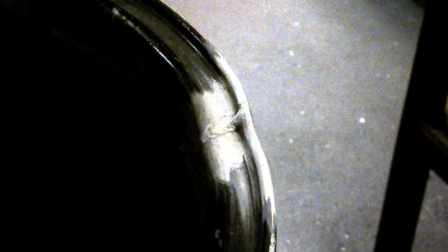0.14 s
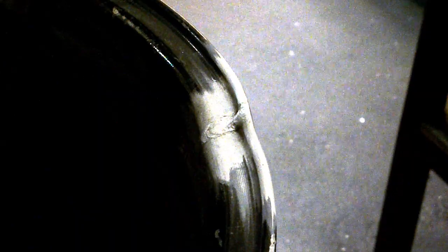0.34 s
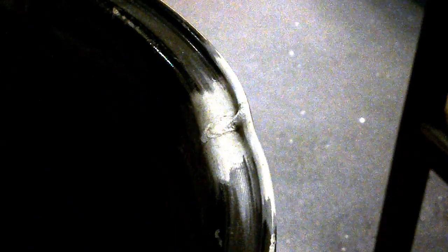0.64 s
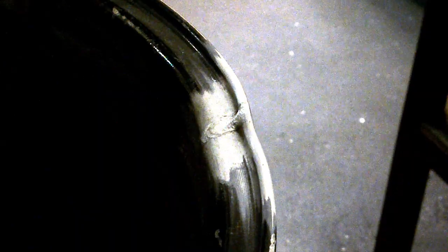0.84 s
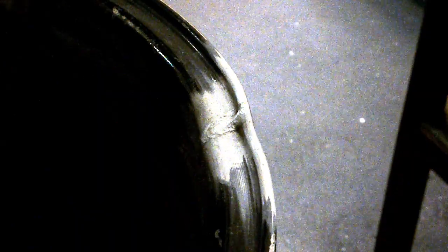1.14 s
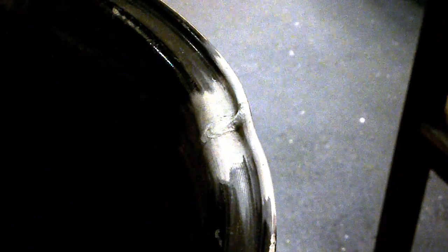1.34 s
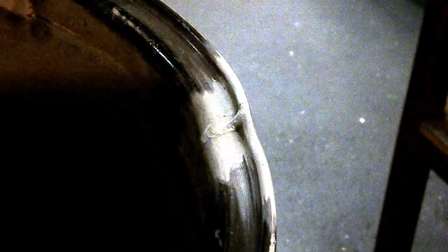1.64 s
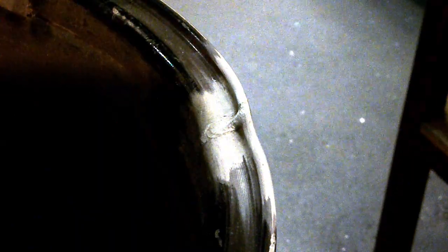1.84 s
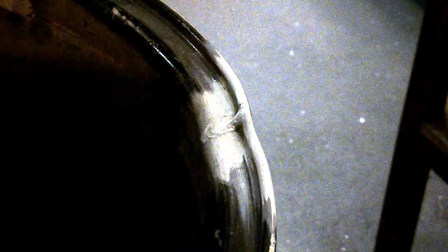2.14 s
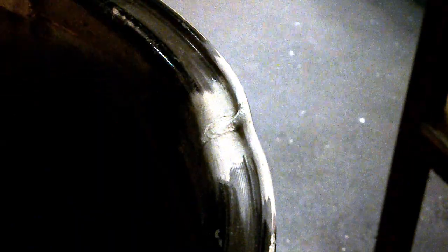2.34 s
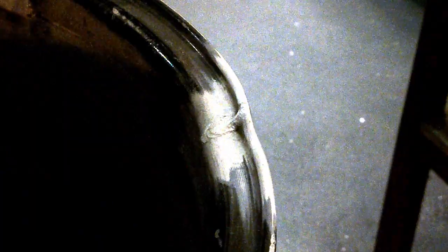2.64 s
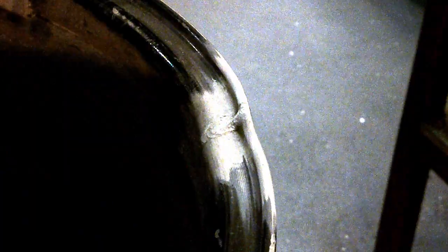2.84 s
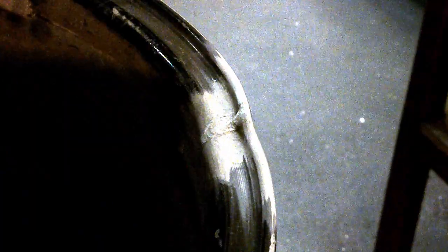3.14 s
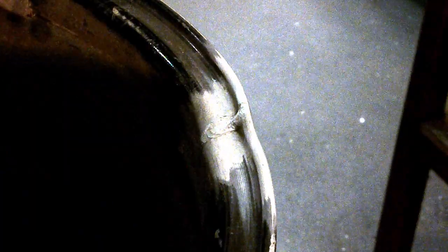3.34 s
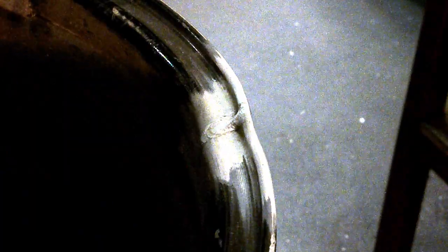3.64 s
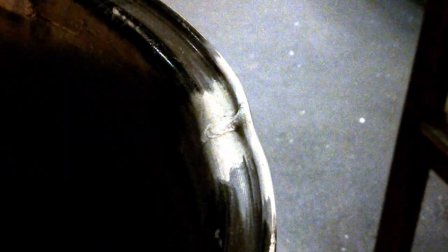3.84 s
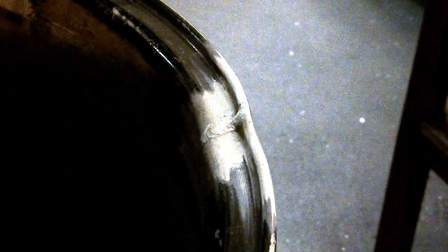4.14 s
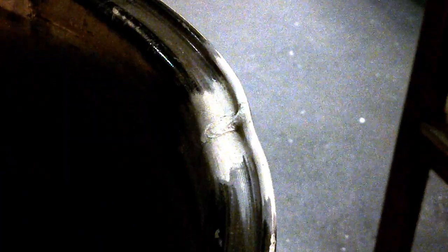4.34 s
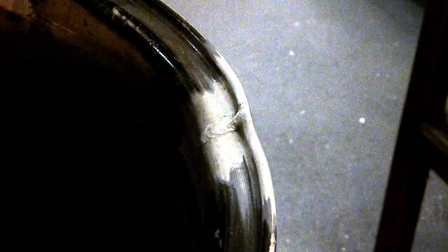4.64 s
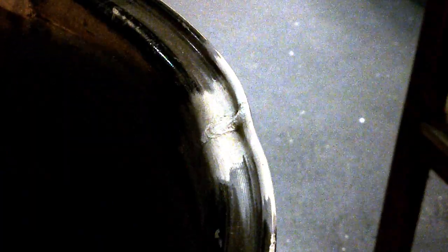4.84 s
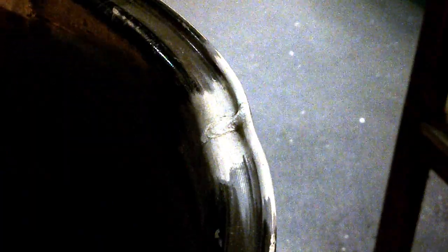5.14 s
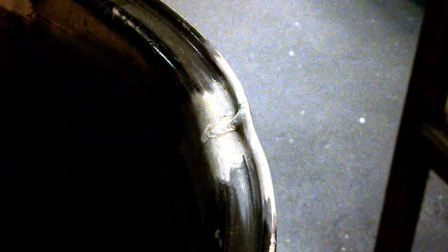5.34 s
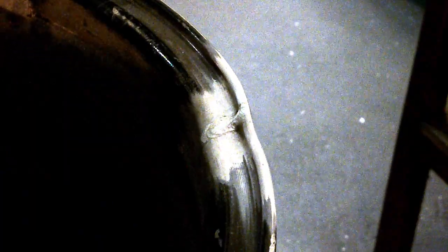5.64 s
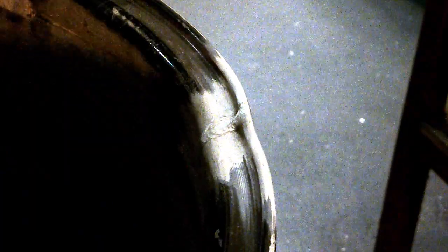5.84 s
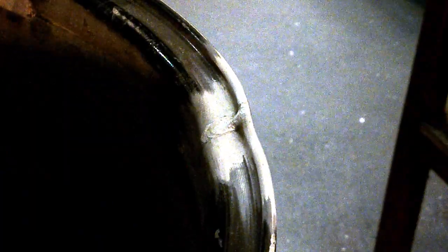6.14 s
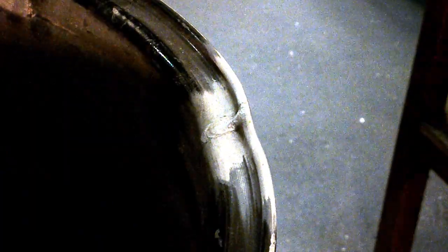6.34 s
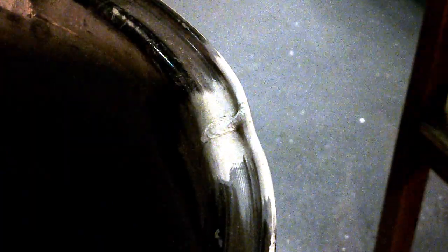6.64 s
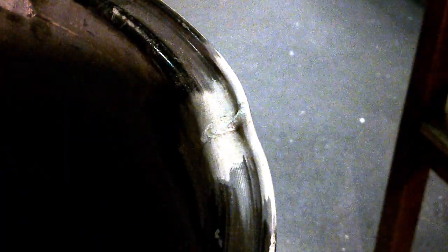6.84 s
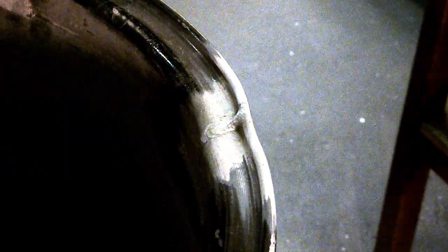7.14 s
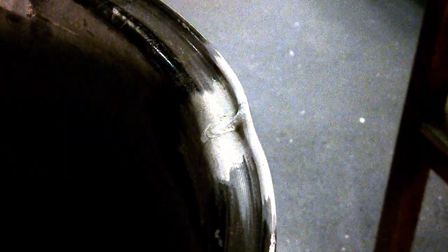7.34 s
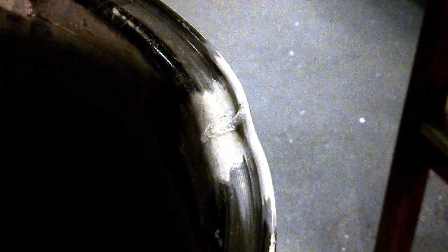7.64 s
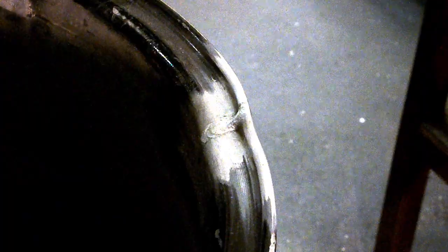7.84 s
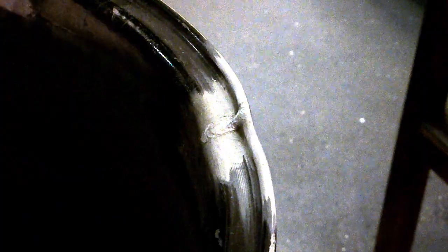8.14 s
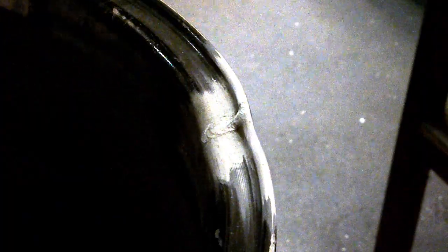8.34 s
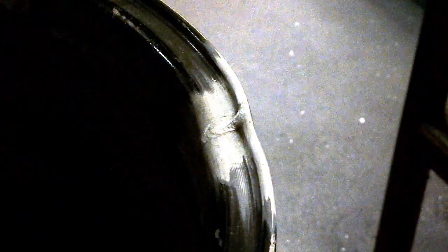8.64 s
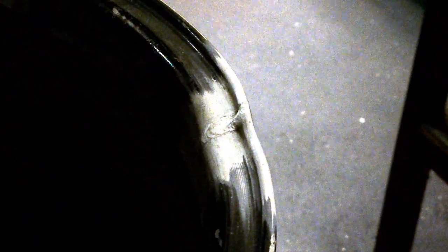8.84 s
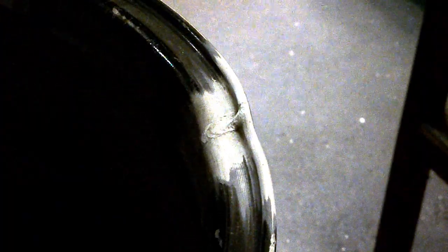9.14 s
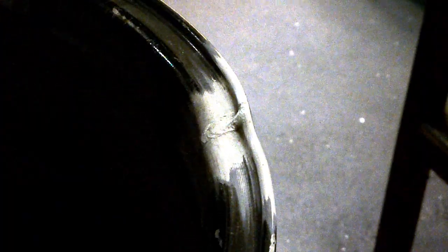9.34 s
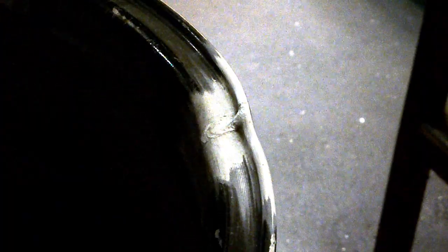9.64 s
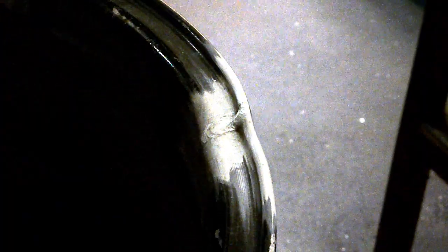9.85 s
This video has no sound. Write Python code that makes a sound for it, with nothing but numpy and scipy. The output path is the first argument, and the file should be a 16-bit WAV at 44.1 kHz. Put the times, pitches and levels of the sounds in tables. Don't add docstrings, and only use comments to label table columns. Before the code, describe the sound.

A torch ignites with a hard pop after two fluttering spits, roars softly with buzzing fuel hiss, then builds stepwise into a fierce bright jet.

```python
import sys
import numpy as np
from scipy import signal
from scipy.fft import rfft, irfft, next_fast_len
from scipy.io import wavfile
from scipy.ndimage import uniform_filter1d

SR = 44100
rng = np.random.default_rng(int(sys.argv[2]) if len(sys.argv) > 2 else 0)


def gain_from_db(level_db):
    decades = np.asarray(level_db, float) / 20
    return 10 ** decades


def to_wav(s):
    ch = np.atleast_2d(s).T
    pcm = np.round(np.clip(ch, -1, 1) * 32767)
    wavfile.write(sys.argv[1], SR, pcm.astype(np.int16))


N = 440118
TIME = np.arange(N) / SR
PADDED = next_fast_len(N, True)


def shape(x, tone):
    hz, db = np.transpose(tone)
    f = np.maximum(np.fft.rfftfreq(PADDED, 1 / SR), 1)
    gain = gain_from_db(np.interp(np.log(f), np.log(hz), db, left=-90, right=-90))
    return irfft(rfft(x, PADDED) * gain, PADDED)[:N]


def level(x, lo_hz, hi_hz):
    band = slice(int(lo_hz * PADDED / SR), int(hi_hz * PADDED / SR))
    power = np.abs(rfft(x, PADDED)[band]) ** 2
    return x * np.sqrt(N * PADDED / (2 * power.sum()))


def bumps(x, modes):
    f = np.fft.rfftfreq(4096, 1 / SR)
    db = sum(d / (1 + (2 * (f - hz) / width) ** 2) for hz, width, d in modes)
    cepstrum = irfft(np.log(gain_from_db(db)))
    cepstrum[1:2048] *= 2
    cepstrum[2049:] = 0
    response = irfft(np.exp(rfft(cepstrum)))
    return signal.fftconvolve(x, response)[:N]


def walk(rate):
    hold = int(SR / rate)
    steps = np.repeat(rng.standard_normal(4000)[:N // hold + 1], hold)
    return 1.3 * uniform_filter1d(uniform_filter1d(steps, hold), hold)[:N]


def play(table, fade_s):
    s, *columns = np.transpose(table)
    gate = np.clip(np.minimum(TIME - s[0] + fade_s, s[-1] + fade_s - TIME) / fade_s, 0, 1)
    return [gate * gain_from_db(np.interp(TIME, s, column)) for column in columns]


def turbulence(tone, lumps_db):
    return shape(gain_from_db(lumps_db) * rng.standard_normal(N), tone)


# frequency in Hz, density in dB per Hz.
FLOOR_TONE = [(12, -51), (20, -21), (69, -11), (111, -2), (248, -8.5), (343, -6), (499, -9.5), (2630, -15),
              (6720, -14.5), (7480, -13.5), (8100, -14.5), (10300, -15), (12100, -38), (15700, -66),
              (22000, -120)]
# frequency in Hz, level in dB rms.
HUM = [(107.7, -71)]


def floor():
    air = bumps(shape(rng.standard_normal(N), FLOOR_TONE), [(7700, 200, -8), (110, 30, -5)])
    sound = gain_from_db(-57) * level(air, 20, 12300)
    wobble = np.cumsum(1 + 0.007 * walk(3.4)) / SR
    for hz, db in HUM:
        sound += np.sqrt(2) * gain_from_db(db + 3.5 + .8 * walk(5)) * np.sin(2 * np.pi * hz * wobble)
    return sound


# start in seconds, peak in dB, length in seconds, fade in dB per second.
SPITS = [
    (0.4894, -47, .045, 90),
    (0.602, -36.5, .23, 81),
]
# time in seconds, hiss in dB.
LEAK = [
    (1.1, -68),
    (1.15, -58),
    (1.18, -52),
    (1.2, -57),
]
# time in seconds, hiss in dB.
VALVE = [
    (1.23, -44),
    (1.45, -49.5),
    (1.6, -47),
    (2.31, -48.5),
    (2.94, -47),
    (5.81, -47),
    (5.98, -49),
    (6.35, -46.5),
]
# time in seconds, flutter in Hz.
FLUTTER = [(0, 79), (2, 77.77), (4, 76.67), (6.5, 76.16)]
# time in seconds, puff-to-puff spread in dB.
SCATTER = [(1.2, 2.5), (2.2, 2), (6.4, 1.5)]
# frequency in Hz, density in dB per Hz.
VALVE_TONE = [(1470, -48), (2500, -4.5), (2970, -34), (3210, -4), (3570, -16), (3810, -11.5), (4440, 1.5),
              (4740, 0), (5130, -5), (6140, 0), (7530, -4.5), (10100, -4), (12100, -22.5), (15700, -55),
              (22000, -120)]
# frequency in Hz, width in Hz, gain in dB.
NOZZLE = [(4903, 106, 7), (5010, 50, -7), (4760, 120, 3.5), (5110, 150, -3), (5960, 300, 5.5),
          (6200, 83, -7), (6420, 90, 4), (6460, 150, -6), (6740, 200, 7.5), (5250, 200, 3), (5660, 110, -6),
          (10000, 260, 5), (4490, 200, -6.5)]


def valve():
    pressure = walk(11)
    flutter_hz = np.interp(TIME, *np.transpose(FLUTTER)) * (1 + 0.0165 * pressure)
    turns = np.cumsum(flutter_hz) / SR + 0.26
    phase = turns % 1
    chance = rng.standard_normal(N // 100)
    spread_db = np.interp(TIME, *np.transpose(SCATTER))
    puff = gain_from_db(spread_db * chance[turns.astype(int)]) * (1 - np.exp(-phase / 0.13)) * np.exp(-phase / 0.43)
    stream = puff + 0.035 * gain_from_db(0.93 * walk(30))
    flow = play(LEAK + VALVE, 0.056)[0] * stream / np.sqrt(np.mean(stream ** 2))
    flow *= gain_from_db(0.6 * (spread_db - SCATTER[-1][1]) * pressure * (TIME > 1.2))
    spit_hz = FLUTTER[0][1]
    for s, db, length_s, fade in SPITS:
        since = TIME[:SR] - s
        cycle = since * spit_hz
        age = cycle % 1 / spit_hz
        size_db = db - 5.0 - fade * since + 1.8 * chance[cycle.astype(int)]
        size_db -= 0.5 * (cycle // 1 % 2)
        spit = gain_from_db(size_db) * np.minimum(age / 0.0012, 1) * np.exp(-age / 0.0056)
        flow[:SR] += (since > 0) * (since < length_s) * spit
    hiss = level(shape(rng.standard_normal(N), VALVE_TONE), 4040, 12000)
    return bumps(flow * hiss, NOZZLE)


# start in seconds, crack in dB, thump in dB, thump length in seconds.
BURSTS = [
    (1.1826, -33, -40, .001),
    (1.1834, -18, -42, .001),
    (1.1841, -8, -9, 0.00057),
    (1.1854, -14, -6, 0.00088),
    (1.1867, -11, 1.5, 0.0012),
    (1.188, -38, -6.5, 0.0021),
    (1.1938, -40, -9, 0.0017),
]
# frequency in Hz, level in dB, 60 dB decay time in seconds.
POP_MODES = [(151, -10, 0.09), (382, 13, 0.031), (590, 0, 0.028), (1410, -13, .03), (2010, -10, .08)]
# frequency in Hz, density in dB per Hz.
CRACK_TONE = [(300, -18), (1000, 0.5), (2500, 2), (4500, -1), (6000, 2.5), (8000, -9), (10500, -17.5),
              (12500, -41)]
# frequency in Hz, density in dB per Hz.
WHOOSH_TONE = [(900, -30), (1400, 3), (1900, 1), (2400, -11), (3200, -25)]


def pop():
    noise, crack, thump = rng.standard_normal(N), np.zeros(N), np.zeros(N)
    for s, crack_db, thump_db, length_s in BURSTS:
        age = np.maximum(TIME[:2 * SR] - s, 0)
        crack[:2 * SR] += gain_from_db(crack_db) * np.minimum(age / 0.00039, 1) * np.exp(-age / 0.00097)
        thump[:2 * SR] -= gain_from_db(thump_db) * np.sin(np.pi * np.minimum(age / length_s, 1)) ** 2
    crack *= level(shape(noise, CRACK_TONE), 300, 12500)
    thump = signal.sosfilt(signal.butter(N=2, Wn=170, btype="high", fs=SR, output="sos"), thump)
    t = TIME[:SR // 2]
    ring = sum(gain_from_db(db - 60 * t / t60) * np.sin(2 * np.pi * hz * t) for hz, db, t60 in POP_MODES)
    ringing = gain_from_db(-50.0) * signal.fftconvolve(thump, ring)[:N]
    age = np.maximum(TIME - 1.19, 0)
    whoosh = gain_from_db(-39.5 - 60 * age / .8) * np.minimum(age / 0.011, 1)
    whoosh *= level(shape(noise, WHOOSH_TONE), 900, 3200)
    return crack + whoosh + thump + ringing


# time in seconds, size in dB, sharpness in dB.
FLAME = [(1.205, -40.5, 6), (1.41, -37.5, 1.5), (1.6, -40, 0), (1.85, -42, -1), (2.39, -47, -1),
         (2.52, -51.5, 2.5), (2.64, -41, -0.5), (2.97, -40, 0), (3.44, -38.5, 3), (3.78, -38.5, 4.5),
         (4.55, -39.5, 5.5), (5.8, -37.5, 5.5), (5.97, -36, 1.5), (6.25, -39.5, 3.5), (6.39, -38, -1),
         (6.52, -57, -6), (6.6, -45.5, -17), (6.9, -69, 10)]
# level in dB against size, slope in dB per dB of sharpness.
FLAME_LAW = [(0, 0), (-12, 0.89), (-21, 1.8)]
# rumble in dB, roar in dB, rush in dB.
FLASH_MIX = (-0.5, -14, -18.5)


def burning():
    size, sharp = play(FLAME, 0.0044)
    rise_s = 0.028
    age = np.maximum(TIME - 1.2, 0)
    flare = np.minimum(age / rise_s, 1) * gain_from_db(-24.5 - 60 * np.maximum(age - rise_s, 0) / 0.23)
    return [size * gain_from_db(db) * sharp ** slope + flare * gain_from_db(mix_db) + share
            for (db, slope), mix_db, share in zip(FLAME_LAW, FLASH_MIX, oxygen())]


# frequency in Hz, density in dB per Hz.
RUMBLE_TONE = [(15, -61), (25, -23), (54, -21), (154, -0.5), (235, -1.5), (297, -4), (376, -1), (461, -5.5),
               (554, 1.5), (667, -6.5), (751, -6), (1090, -14), (1400, -36), (1820, -26), (3080, -120)]
# frequency in Hz, density in dB per Hz.
ROAR_TONE = [(400, -17), (700, -6.5), (900, -7.5), (1150, 0), (1500, 0.5), (2200, -10.5), (4000, -28)]
# frequency in Hz, density in dB per Hz.
RUSH_TONE = [(900, -18.5), (1500, -6), (2000, -0.5), (2800, 0), (3600, -1), (5000, -5), (9000, -17)]


def flame():
    rumble, roar, rush = burning()
    flicker = walk(18)
    low = level(turbulence(RUMBLE_TONE, .5 * flicker + 1.0 * walk(60)), 100, 1100)
    middle = level(turbulence(ROAR_TONE, 0.59 * flicker + 0.84 * walk(70)), 690, 1586)
    high = level(turbulence(RUSH_TONE, .5 * flicker + 0.44 * walk(180)), 1400, 3490)
    return rumble * low + roar * middle + rush * high


# time in seconds, hiss in dB.
JET = [
    (6.24, -64),
    (6.39, -40.5),
    (6.44, -36),
    (7.38, -30),
    (7.94, -29.5),
    (7.97, -26),
    (9.14, -20),
    (9.5, -19),
    (9.98, -18.5),
]
# top in dB, best jet level in dB, slope below and slope above in dB per dB.
ROAR_LAW = (-38.5, -37, 0.5, 0.54)
RUSH_LAW = (-30.5, -29, 0.98, 0.4)
BUFFET_LAW = (-48.5, -40.5, 6, 2.8)
# top in dB, best jet level in dB, slope below and
# slope above in dB per dB.
THROB_LAW = (-47.5, -20.5, 4, 2)
# rumble in dB, roar in dB, rush in dB, buffet in dB.
STIR_MIX = (0, -18, -33, -9.5)


def oxygen():
    jet_db = np.interp(TIME, *np.transpose(JET))
    opened = np.clip((TIME - JET[0][0]) / 0.056, 0, 1)

    def law(top, best, below, above):
        return gain_from_db(top - below * np.maximum(best - jet_db, 0) - above * np.maximum(jet_db - best, 0))

    stir = gain_from_db(-56 + 3.22 * np.maximum(jet_db + 23.5, 0))
    layers = (0, law(*ROAR_LAW), law(*RUSH_LAW), law(*BUFFET_LAW) + law(*THROB_LAW))
    return [opened * (own + stir * gain_from_db(db)) for own, db in zip(layers, STIR_MIX)]


# frequency in Hz, density in dB per Hz.
JET_TONE = [(1470, -35), (2500, -24), (2820, -9.5), (3340, -11), (4270, -1.5), (4560, -0.5), (5270, -7),
            (6820, 0), (7830, -10.5), (8420, -6), (9680, -8), (10800, -14.5), (12100, -33), (15700, -61),
            (22000, -120)]
# frequency in Hz, density in dB per Hz.
BUFFET_TONE = [(20, -30), (50, -24), (110, -3), (180, -1), (300, -5), (600, -30)]
# frequency in Hz, width in Hz, gain in dB.
HARD = [(2250, 170, 18), (4400, 630, -5), (4850, 140, 3.5), (6900, 270, 2)]
# start in seconds, end in seconds.
HARDEN_S = (8.5, 9.1)


def jet():
    soft = level(turbulence(JET_TONE, 0.71 * walk(25) + 0.72 * walk(180)), 4150, 11600)
    share = np.interp(TIME, HARDEN_S, (0, 1))
    hiss = (1 - share) * soft + share * bumps(soft, HARD)
    catch = np.clip((TIME - 6.35) / .04, 0, 1)
    buffet = level(turbulence(BUFFET_TONE, 2.0 * walk(30)), 40, 224)
    return play(JET, 0.041)[0] * catch * hiss + gain_from_db(-3.0) * oxygen()[-1] * buffet


# 60 dB decay time in seconds, level in dB,
# lowest frequency in Hz, highest frequency in Hz.
SHOP = [
    (.04, -13, 1470, 12000),
    (.2, -8.5, 1230, 12000),
    (.6, -9, 60, 1500),
]
# frequency in Hz, width in Hz, gain in dB.
PLACE = [(109, 6.9, 1), (166, 11, 3), (251, 15, 2), (1026, 100, 2), (1847, 260, 0.5), (303, 17, -4),
         (391, 42, 2.5), (490, 31, -5.5), (662, 88, 3), (737, 150, -4), (1419, 154, -10), (2505, 360, -3.5),
         (3260, 230, -4), (4215, 310, -4), (5000, 160, -1.5), (6050, 180, 0.5), (6430, 540, 1.5),
         (7610, 113, -17.5), (7510, 130, 3.5), (8390, 240, 4), (8840, 200, -4.5), (9200, 230, 1),
         (10500, 250, 2.5), (10800, 220, -3.5)]


def shop(x):
    t = np.arange(SR // 2) / SR
    echoes = 1. * (t == 0)
    for t60, db, lo_hz, hi_hz in SHOP:
        tail = rng.standard_normal(len(t)) * gain_from_db(-60 * t / t60) * np.clip(t / .003, 0, 1)
        tail = gain_from_db(db) * tail / np.sqrt(np.sum(tail ** 2))
        band = signal.butter(N=1, Wn=[lo_hz, hi_hz], btype="band", fs=SR, output="sos")
        echoes += signal.sosfilt(band, tail)
    return bumps(signal.fftconvolve(x, echoes)[:N], PLACE)


# frequency in Hz, width in Hz, gain in dB.
TIP = [(11450, 260, 4), (2170, 86, -2.5), (2740, 330, 5.5), (3220, 290, -2), (3630, 100, 2),
       (4100, 280, -2), (4620, 270, 5.5), (5460, 120, 4.5)]


def scene():
    burner = bumps(flame() + jet(), TIP)
    mono = shop(gain_from_db(-1.5) * (valve() + burner) + pop()) + floor()
    return np.array([mono, mono])


def top_cut(x):
    return signal.sosfilt(signal.butter(12, 12260, fs=SR, output="sos"), x)


def record(dry):
    port = signal.butter(N=2, Wn=45, btype="high", fs=SR, output="sos")
    top = signal.ellip(6, .2, 50, 12330, fs=SR, output="sos")
    mix = signal.sosfilt(np.vstack([port, top]), dry)
    return top_cut(mix)


dry = scene()
out = record(dry)
to_wav(out)
```